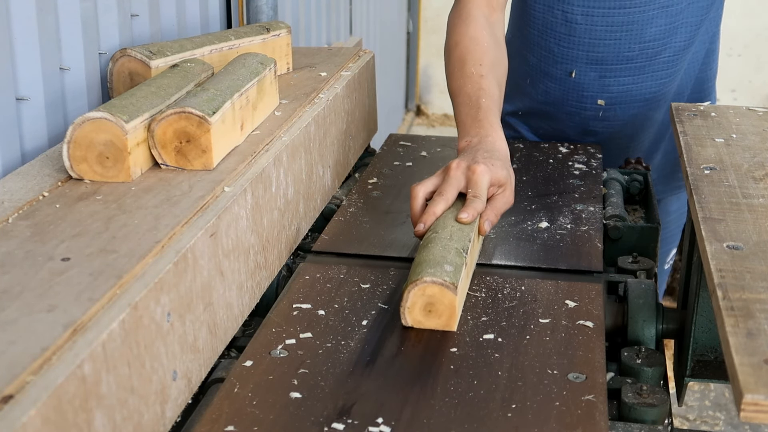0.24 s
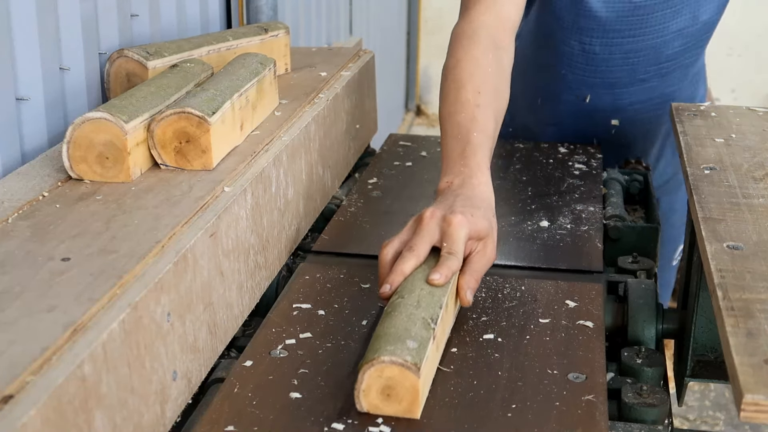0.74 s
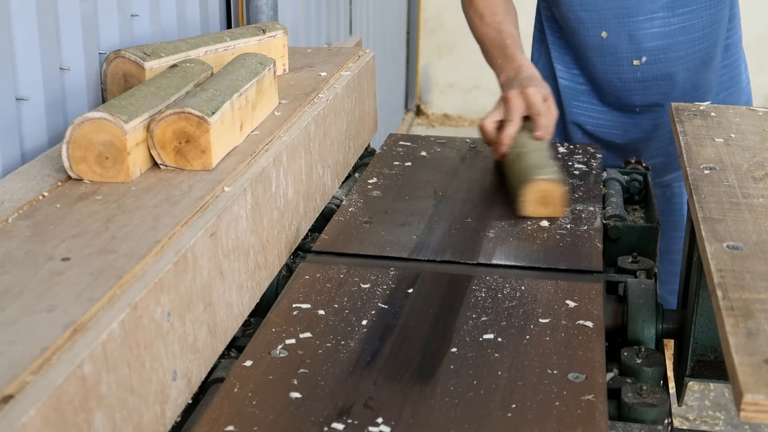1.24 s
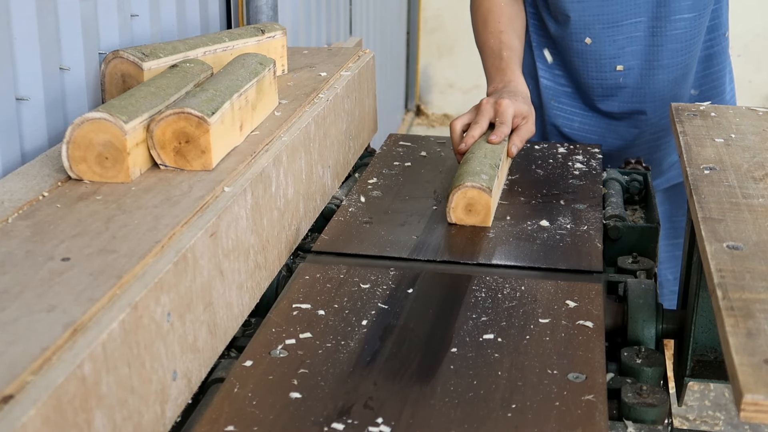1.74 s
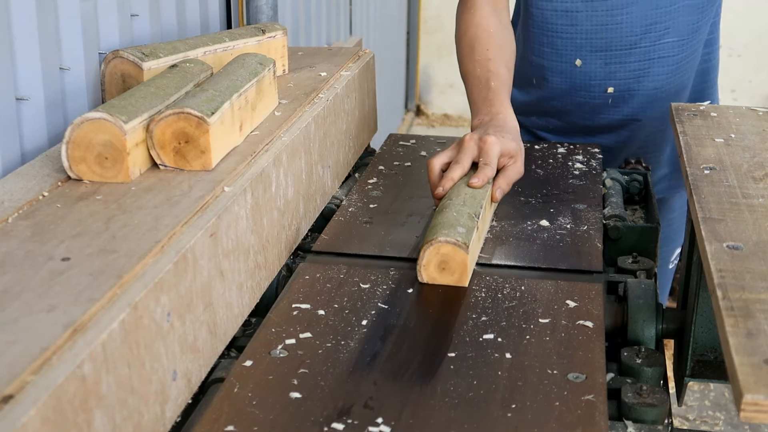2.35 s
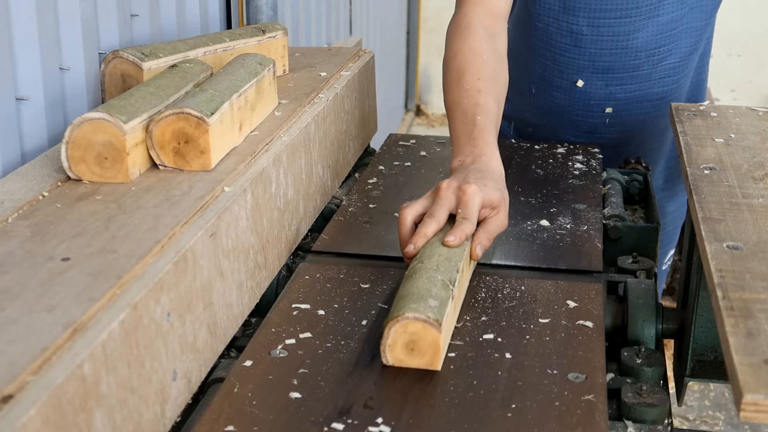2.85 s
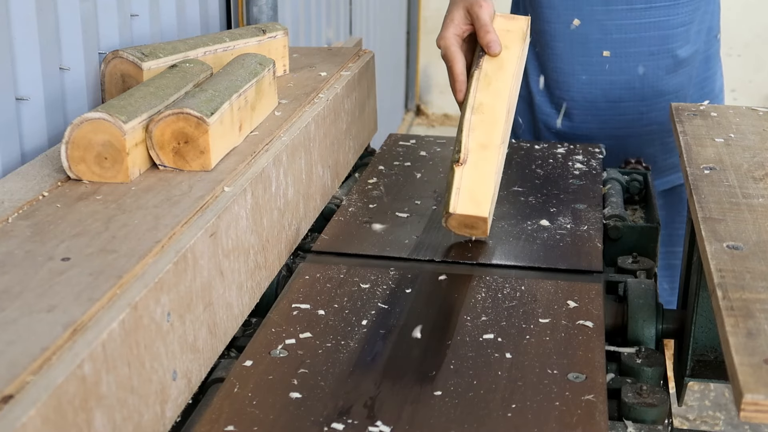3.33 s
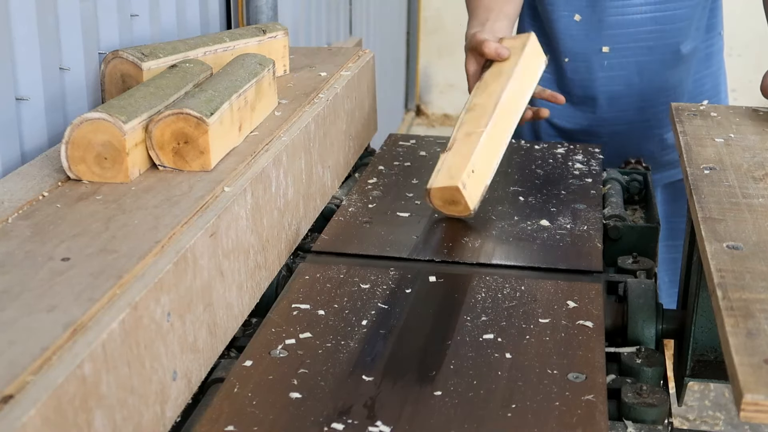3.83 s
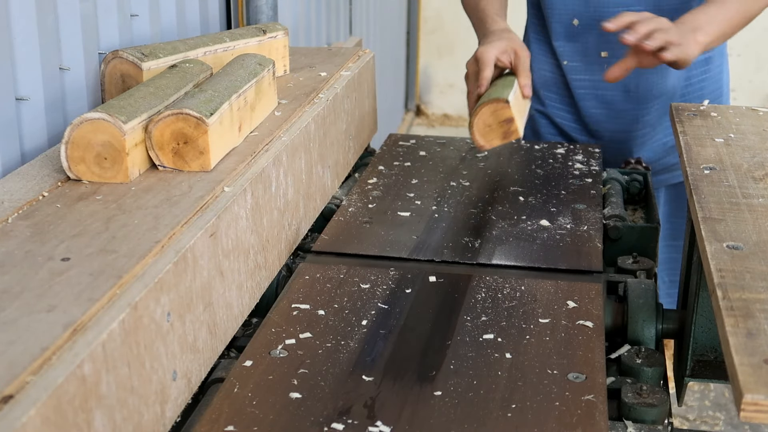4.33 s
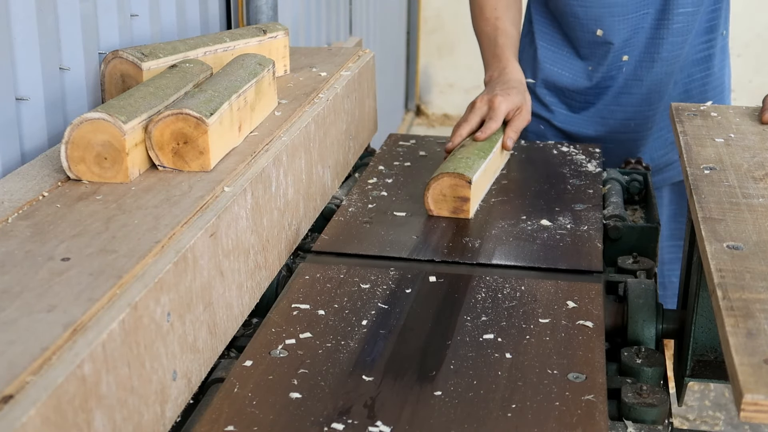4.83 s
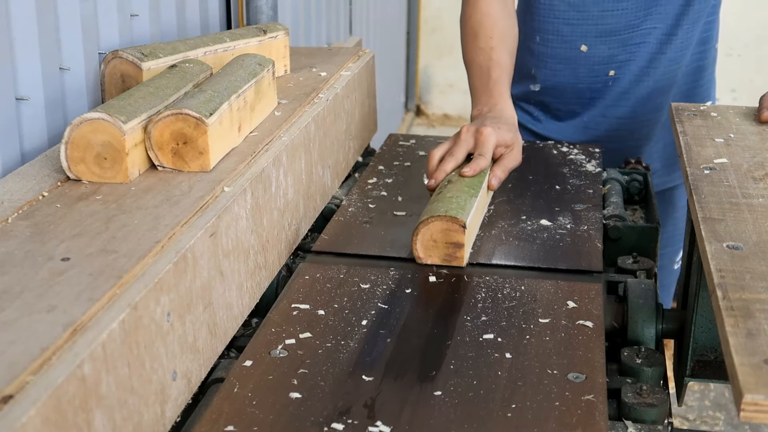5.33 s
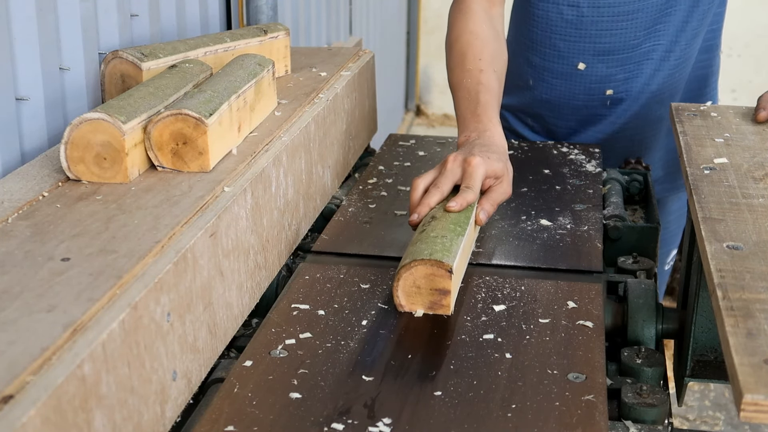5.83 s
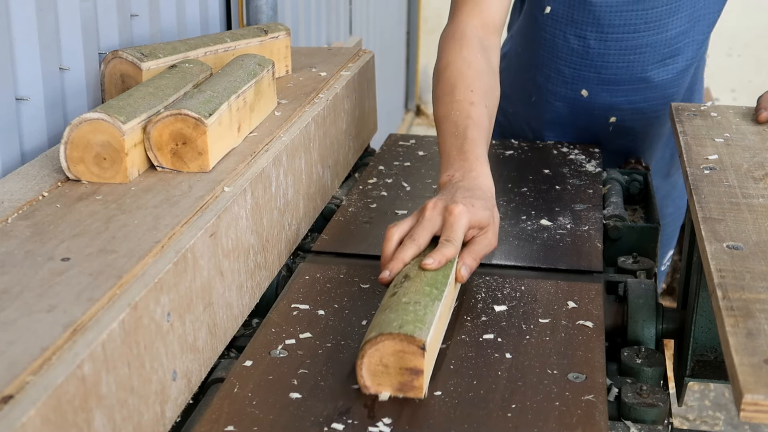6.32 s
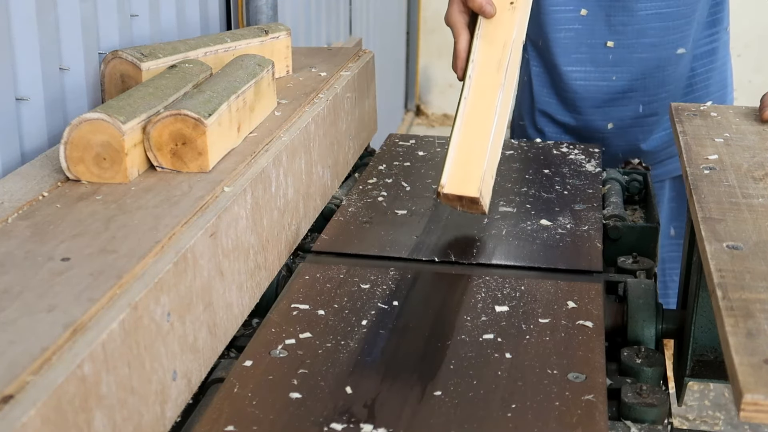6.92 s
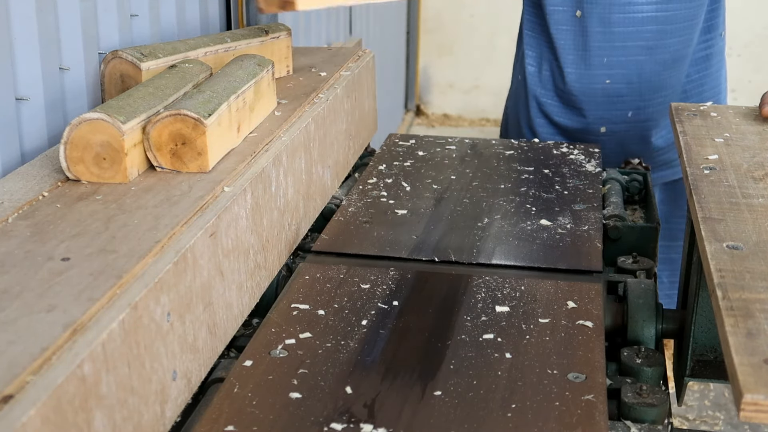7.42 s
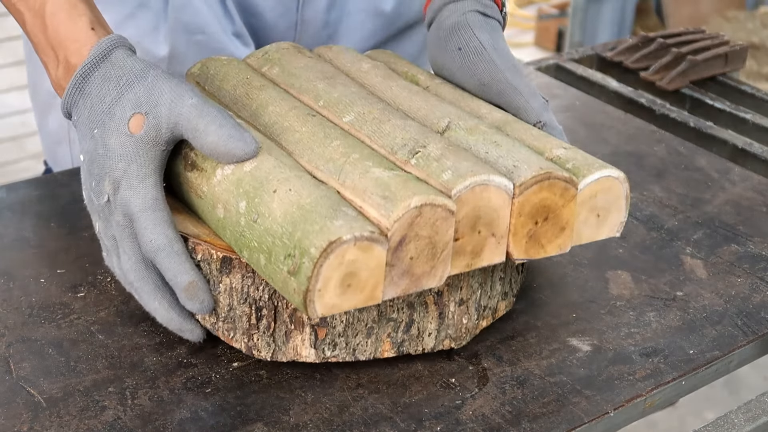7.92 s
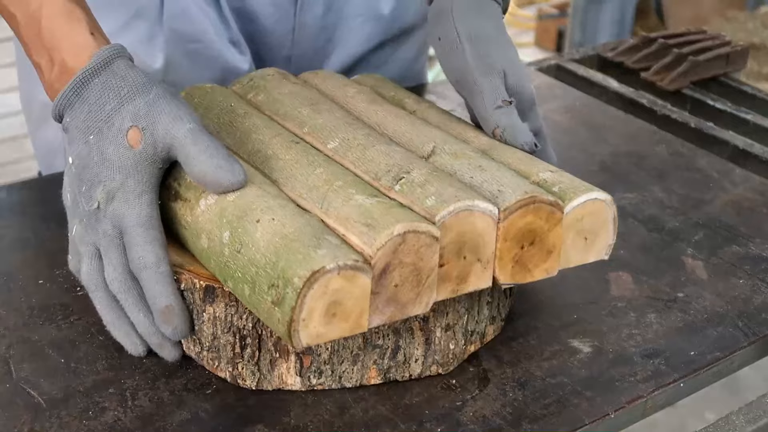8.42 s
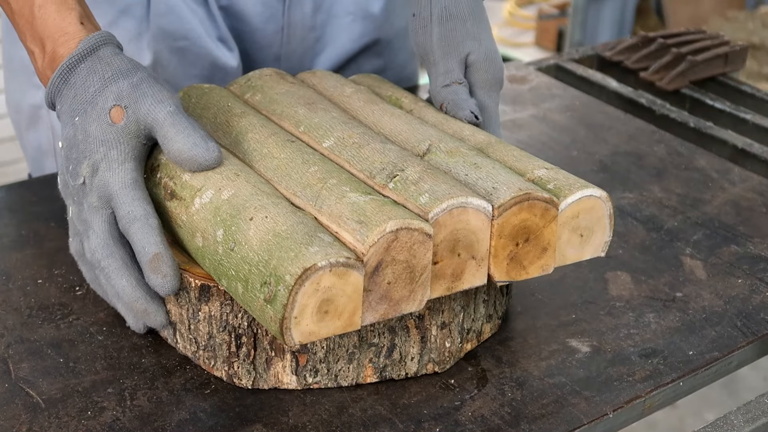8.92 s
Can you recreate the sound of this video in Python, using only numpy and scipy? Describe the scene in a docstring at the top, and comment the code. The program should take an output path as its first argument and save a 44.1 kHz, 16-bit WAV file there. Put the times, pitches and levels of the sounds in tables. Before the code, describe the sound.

A wood planer runs close by in a workshop, with a wavering low hum, rumble and rushing air. From the start its knives tear a branch with a rough hiss, chattering harder until 0.8 seconds. The machine idles, and the wood knocks on its iron bed at 1.3 and 1.5 seconds. A second cut runs from 2.1 to 3 seconds, ending in a loud rattle. Chips tick faintly at 3.8, a soft thump follows at 4.2, and the branch knocks at 4.6 and, more sharply, 4.8. The third cut lasts from 5.4 to 6.4 seconds, again finishing in chatter. At 7.6 the drone abruptly vanishes, leaving faint room noise and gloves brushing bark. At 8.3 a stack of branches thuds and clatters onto a steel table, which rings and fades, with faint brushes near 9. Throughout, the volume ducks at loud moments and swells back.

```python
"""First comes the drone of a jointer (a wood planer) and the hiss of its spinning knives tearing a branch.
The branch goes over three times, chattering harder as its tail leaves the table; between passes it
knocks on the iron bed. The machine is abruptly gone, gloves brush bark, and a stack of branches lands
on a ringing steel table. An automatic volume control ducks at every loud moment and swells back."""
import sys
import numpy as np
from scipy import signal
from scipy.fft import rfft, irfft, next_fast_len
from scipy.io import wavfile
from scipy.ndimage import uniform_filter1d, map_coordinates

SR = 44100
rng = np.random.default_rng(int(sys.argv[2]) if len(sys.argv) > 2 else 0)


def to_wav(sig):
    """Store sig (one row per channel, or 1-D mono) as 16-bit WAV at the path in sys.argv[1].

    Samples outside -1..1 are clipped; the rate is SR.
    """
    pcm = np.clip(np.atleast_2d(sig), -1, 1) * 32767
    pcm = np.round(pcm).astype(np.int16)
    wavfile.write(sys.argv[1], SR, pcm.T)  # frames by channels


N = 403956
TIME = np.arange(N) / SR


def amp(db):
    """Turn decibels into a multiplier."""
    return 10 ** (np.asarray(db) / 20)


def unit(x):
    """Scale to an average (rms) level of 1."""
    return x / np.sqrt(np.mean(x ** 2) + 1e-20)


def along(points, hz):
    """Read between (Hz, value) points, spaced as musical pitches."""
    f, v = np.transpose(points)
    return np.interp(np.log(hz + 1), np.log(f + 1), v)


def wobble(rate):
    """A smooth random curve for each ear, with rate new values a second."""
    knots = rng.standard_normal((2, int(N * rate / SR) + 4))
    coarse = TIME[::32]
    return np.array([np.interp(TIME, coarse, map_coordinates(k, [coarse * rate])) for k in knots])


def swell(s, db, half_length):
    """A smooth rise and fall that peaks at time s."""
    return amp(db) * np.exp(-((TIME - s) / half_length) ** 2)


def filtered(x, response):
    """Multiply each frequency of x by response(hz)."""
    n = x.shape[-1]
    m = next_fast_len(n + SR // 4)
    return irfft(rfft(x, m) * response(np.fft.rfftfreq(m, 1 / SR)), m)[..., :n]


def coloured(x, spectrum):
    """Shape the lows and highs of x, at level 1."""
    return unit(filtered(x, lambda hz: amp(along(spectrum, hz))))


def resonate(x, modes):
    """Pass x through an object that favours a few notes, at level 1."""
    def body(f):
        return sum(amp(db) * (1j * f * width / (hz * hz - f * f + 1j * f * width)) ** 2
                   for hz, width, db in modes)
    return unit(filtered(x, body))


def stereo_noise(alike, n=N):
    """White noise, as alike in both ears as the table says (1 is identical)."""
    def shares(hz):
        turn = np.arccos(np.clip(along(alike, hz), -1, 1)) / 2
        return np.array([np.cos(turn), np.sin(turn)])
    mid, side = filtered(rng.standard_normal((2, n)), shares)
    return np.array([mid + side, mid - side])


def swirling(depth_db, swirl_rad, frame=2048, patch_frames=6):
    """Noise whose frequencies come and go in patches and drift between the ears."""
    frames = dict(nperseg=frame, noverlap=frame - frame // 4)
    z = signal.stft(rng.standard_normal(N), **frames)[2]
    patches = uniform_filter1d(rng.standard_normal((2,) + z.shape), size=5, axis=1)
    gain, turn = unit(uniform_filter1d(patches, size=patch_frames, axis=2))
    z = z * amp(depth_db * gain)
    lead = np.exp(.5j * swirl_rad * turn)
    return signal.istft(np.array([z * lead, z / lead]), **frames)[1][:, :N]


def dying(x, fade_times):
    """Fade each frequency at its own speed. A fade time is how long a drop of 60 dB takes."""
    hz, t, z = signal.stft(x, SR, nperseg=256)
    fade = amp(-60 * t / along(fade_times, hz)[:, None])
    return signal.istft(z * fade, SR, nperseg=256)[1][:, :x.shape[-1]]


def ring(modes, t, scatter_db):
    """The fading notes of a struck object, a little different at each blow."""
    hz, db, fade_s = np.transpose(modes)[:, :, None]
    size, phase = rng.uniform(-1, 1, (2, len(modes), 1))
    levels = amp(db + scatter_db * size - 60 * t / fade_s)
    return np.sum(levels * np.sin(2 * np.pi * hz * t + np.pi * phase), axis=0)


def soften(x, corner_hz, order):
    """Turn down everything above corner_hz, as a softer contact does."""
    return signal.sosfilt(signal.butter(order, min(corner_hz, SR / 3), fs=SR, output="sos"), x)


def add(track, s, sound):
    """Mix a sound into the track at time s."""
    part = track[:, round(s * SR):][:, :sound.shape[-1]]
    part += sound[..., :part.shape[-1]]


# The branch's passes. Each row: start and end in seconds, tearing in dB, rattle in dB,
# build-up of the tearing and of the rattle in seconds, frame shudder in dB.
PASSES = [(-0.1, 0.78, -30, -26, 0.21, 0.11, -29), (2.14, 3.038, -31, -30.5, 0.52, 0.1, -27.5),
          (5.432, 6.423, -29.5, -30.5, 0.18, 0.14, -24)]
ENTRY_S, EXIT_S = 0.0097, 0.018  # the cut starts and dies away
BITE_DB, BITE_S = 7, 0.031  # the knives bite harder into the front edge
TAIL_TEAR_DB, TAIL_RATTLE_DB = 10, 8.5  # extra as ever less wood rests on the table
RATTLE_LEAD_S = 0.048  # the rattle peaks this long before the end
FEED_DB, SHAKE_DB, FEED_RATE = 0.74, 1.3, 11  # uneven push: swing of tearing, of shaking, changes a second

def feed_branch():
    """Levels for contact, tearing, rattle and shudder: each pass bites, steadies, then roughens."""
    levels = np.zeros((4, N))
    for start, end, tear_db, rattle_db, tail_s, rattle_s, shudder_db in PASSES:
        since, left = np.maximum(TIME - start, 0), np.maximum(end - TIME, 0)
        contact = (1 - np.exp(-since / ENTRY_S)) * np.exp(-np.maximum(TIME - end, 0) / EXIT_S)
        tail = np.exp(-(left / tail_s) ** 2)
        loose = 1 / (1 + ((left - RATTLE_LEAD_S) / rattle_s) ** 2)
        tear = amp(tear_db + BITE_DB * np.exp(-since / BITE_S) + TAIL_TEAR_DB * tail)
        rattle = amp(rattle_db + TAIL_RATTLE_DB * loose)
        levels += [contact, contact * tear, contact * rattle, contact * amp(shudder_db)]
    levels[1] *= amp(FEED_DB * wobble(FEED_RATE)[0])
    return levels


# The hum falters and races. Each row: time in seconds, pitch in Hz.
HUM_PITCH = [(0.0, 159.5), (0.26, 166.5), (0.34, 155), (0.48, 166.4), (0.76, 164.6), (0.8, 158.0),
             (1.42, 163), (2.02, 161.8), (2.08, 157.1), (2.57, 162), (2.73, 158.7), (2.79, 164),
             (3.27, 157.3), (4.01, 161.3), (4.23, 157.9), (4.31, 162.2), (4.47, 158.6), (4.55, 165),
             (4.69, 160), (4.85, 161.8), (5.13, 160), (5.69, 163), (5.87, 156.8), (6.13, 166.1),
             (6.62, 158.7), (7.26, 161.4), (7.36, 158), (7.6, 166.5)]
WAVER_HZ, WAVER_RATE = 0.94, 12  # depth, changes a second

def hum_cycles():
    """Count the cycles of the machine's hum as its pitch wavers."""
    pitch_hz = np.interp(TIME, *np.transpose(HUM_PITCH)) + WAVER_HZ * wobble(WAVER_RATE)[0]
    return np.cumsum(pitch_hz) / SR


# The hum's tones. Each row: multiple of its pitch, level in dB, phase drift in radians.
HUM_TONES = [(1, -14.5, 0.53), (5 / 4, -34.5, 1), (3 / 2, -31, 0.3), (7 / 4, -35.5, 0.8), (2, -31.5, 0.84),
             (3, -37, 1.0)]
# The frame's steady rumble and its shudder in a cut. Each row: frequency in Hz, level in dB.
RUMBLE = [(20, -25), (45, -5), (75, -7), (120, 4.5), (160, 0.5), (205, 0), (260, -6), (330, -35),
          (600, -120)]
SHUDDER = [(20, -24), (45, -0.5), (85, -9), (130, 6), (200, 0.5), (300, -45.5)]
# The bass sways between the ears. Each row: time in seconds, the left ear's lead in cycles.
BASS_SWAY = [(0.0, 0.087), (0.2, -0.26), (0.3, 0.38), (0.48, -0.32), (0.52, 0.39), (0.64, -0.0075),
             (0.74, -0.91), (0.98, -0.019), (1.3, -0.876), (1.66, -1.2), (1.7, -0.85), (2.12, -0.62),
             (2.37, -1.13), (2.65, 0.47), (2.83, 0.274), (3.05, 0.83), (3.33, 0.087), (3.43, 0.45),
             (3.55, -0.076), (3.65, 0.058), (3.69, 0.65), (4.31, 0.77), (4.45, 0.12), (5.15, -0.815),
             (5.55, -0.66), (5.71, -2.04), (5.85, -1.276), (5.93, -1.72), (6.19, -1.7), (6.21, -1.33),
             (6.37, -2.04), (6.59, -1.11), (6.68, -0.99), (6.74, -1.484), (7.1, -1.14), (7.2, -1.633),
             (7.48, -1.43), (7.6, -1.06)]
SWAY_RAD, SWAY_RATE = 0.25, 25  # extra random sway: depth, changes a second
THROB_HZ, THROB_DB, THROB_RISE = 40.6, -33, 0.148  # the pitch rises by this share at full load
RUMBLE_DB, MUFFLE_DB = -27.5, -2.5

def drone(cycles, load, shudder):
    """Hum, deep throb and rumble. In a cut, wood over the slot muffles the hum and the frame shudders."""
    hum = np.zeros(N)
    for multiple, db, wander in HUM_TONES:
        drift = wander * (0.68 * wobble(11)[0] + 0.74 * wobble(55)[0])
        hum += amp(db + 0.93 * wobble(30)[0]) * np.sqrt(2) * np.sin(2 * np.pi * multiple * cycles + drift)
    throb_cycles = np.cumsum(THROB_HZ * (1 + THROB_RISE * load) + 1.9 * wobble(9)[0]) / SR
    throb = amp(THROB_DB + 2.1 * wobble(7.3)[0]) * np.sqrt(2) * np.sin(2 * np.pi * throb_cycles)
    rumble = amp(RUMBLE_DB + 1.2 * wobble(18)[0]) * coloured(rng.standard_normal(N), RUMBLE)
    frame = shudder * amp(2.9 * wobble(14)[0]) * coloured(rng.standard_normal(N), SHUDDER)
    lead = 2 * np.pi * np.interp(TIME, *np.transpose(BASS_SWAY)) + SWAY_RAD * wobble(SWAY_RATE)[0]
    bass = signal.hilbert(amp(MUFFLE_DB * load) * hum + throb + rumble + frame)
    return np.real(bass * np.exp(1j * lead * np.array([[.5], [-.5]])))


# Rushing air and the housing's low roar. Each row: frequency in Hz, level in dB.
AIR = [(150, -9), (400, -12), (650, -6.5), (817, -1), (1160, -10), (1440, 0), (1890, -10.5), (2200, 1.5),
       (2330, 2.5), (2620, -4), (2880, -12), (3410, -18.5), (9070, -31.5), (10700, -40), (12200, -64)]
ROAR = [(100, -88), (190, -3.5), (270, -1), (320, 1), (420, -3), (500, -3), (680, -13.5), (1000, -45),
        (2000, -120)]

def rushing_air(cycles):
    """The knives whip air through their slot, pulsing with the hum, over the housing's roar."""
    pulse = 1 + 0.14 * np.sin(2 * np.pi * cycles + 1.3 * wobble(10)[0])
    flutter = amp(1.19 * wobble(130)[0] + 0.86 * wobble(12)[0])
    air = coloured(swirling(depth_db=0.25, swirl_rad=3.56) * pulse, AIR)
    roar = coloured(swirling(depth_db=1.0, swirl_rad=3.53), ROAR)
    return flutter * (amp(-23) * air + amp(-25) * roar)


KNIFE_HZ = 107.3  # strokes a second

def knife_strokes(noise, life_s, scatter_db, steady):
    """Each stroke tears off a chip: a burst of its own size on top of steady noise."""
    count, phase = np.divmod(TIME * KNIFE_HZ, 1)
    sizes = amp(scatter_db * rng.uniform(-1, 1, int(count[-1]) + 1))
    burst = unit(sizes[count.astype(int)] * np.exp(-phase / KNIFE_HZ / life_s))
    return (steady + burst) * noise


# Tearing wood fibres. Each row: frequency in Hz, level in dB.
FIBRES = [(150, 8), (400, 4.5), (650, 7), (1200, -3), (2300, 8), (2900, 0), (3300, -4.5), (3700, -0.5),
          (4200, -0.5), (5700, -0.5), (6980, -5.5), (9380, -8), (12100, -17), (13000, -45)]

def tearing_wood(tear):
    """The fibres hiss as the knives rip through them."""
    noise = swirling(depth_db=1.86, swirl_rad=4.2, frame=1024, patch_frames=20)
    rips = knife_strokes(noise, life_s=0.0027, scatter_db=5.0, steady=2.6)
    return amp(3 + 0.24 * wobble(32)[0]) * tear * coloured(rips, FIBRES)


# The notes of the jointer's table. Each row: pitch in Hz, width in Hz, level in dB.
TABLE_NOTES = [(1050, 127, -4.5), (1234, 110, 0), (1324, 47, 6), (1443, 187, 1), (1830, 300, -7.5),
               (2337, 510, -5)]
# Hard spots in the wood. Each row: time in seconds, level in dB.
HARD_SPOTS = [(0.22, -43), (2.3, -27.5), (2.6, -29.5), (5.73, -31), (6.08, -30.5)]

def table_rattle(rattle, contact):
    """The strokes shake the table, and hard spots in the wood jolt it."""
    jolts = sum(swell(s, db, half_length=0.04) for s, db in HARD_SPOTS)
    noise = swirling(depth_db=0.0, swirl_rad=3.63)
    blows = knife_strokes(noise, life_s=0.0019, scatter_db=-1.0, steady=1.25)
    return amp(2) * (rattle + contact * jolts) * resonate(blows, TABLE_NOTES)


# The branch chatters as the grip loosens. Each row: time in seconds, level in dB, pitch in Hz.
CHATTER = [(0, -30, 850), (.34, -21.5, 898), (.58, -20.5, 865), (.65, -12, 850), (.71, -17, 870),
           (2.15, -34, 880), (2.8, -34.5, 881), (2.93, -14, 855), (3.015, -12, 880), (3.05, -34, 880),
           (5.97, -34.5, 894), (6.139, -20.5, 875), (6.3, -20.5, 846), (6.39, -10.5, 870), (6.44, -32, 870)]
# The table's high notes. Each row: pitch in Hz, width in Hz, level in dB.
WHINE = [(3000, 19, 4.5), (5800, 300, -11)]
BRANCH_WIDTH_HZ, BRANCH_ROUGH = 62, 1.47  # the rough part's spread, and its size beside the clean part

def branch_chatter(contact):
    """The knives keep the branch ringing on one rough, sliding note; the table whines along."""
    times, db, pitch_hz = np.transpose(CHATTER)
    phase = 2 * np.pi * np.cumsum(np.interp(TIME, times, pitch_hz)) / SR
    spread = lambda: unit(soften(rng.standard_normal((2, N)), BRANCH_WIDTH_HZ, order=2))
    clean = np.sin(phase + 0.99 * wobble(30)[0] + 0.65 * wobble(20))
    rough = spread() * np.sin(phase) + spread() * np.cos(phase)
    whine = amp(-18.5) * resonate(rng.standard_normal((2, N)), WHINE)
    return contact * amp(np.interp(TIME, times, db)) * (unit(clean + BRANCH_ROUGH * rough) + whine)


# The workshop's background. Each row: frequency in Hz, level in dB.
ROOM_TONE = [(25, -12), (60, 0.5), (140, -2), (250, -9.5), (750, -13), (1500, -18.5), (3000, -23),
             (6000, -30), (11000, -39), (13000, -49)]
# How quiet sounds spread. Each row: frequency in Hz, likeness between the ears.
QUIET_ALIKE = [(100, 1), (700, 0.78), (2800, 0.68), (6200, .05)]

def room_tone():
    """A faint, low noise fills the shop throughout."""
    return amp(-41) * coloured(stereo_noise(QUIET_ALIKE), ROOM_TONE)


# Two last blows per pass. Each row: time in seconds, level in dB, half-length in seconds.
KICKS = [(0.734, -7.5, .008), (0.761, -8, 0.017), (2.982, -10.5, .007), (3.013, -4.5, 0.014),
         (6.385, -13.5, 0.015), (6.414, -14.5, 0.0063)]
# The notes they ring with. Each row: pitch in Hz, width in Hz, level in dB.
KICK_NOTES = [(870, 210, -0.5), (1190, 200, -2), (1420, 350, 6.5), (1730, 330, -5), (2590, 300, -3.5),
              (2880, 300, -8.5), (4530, 400, -7), (5940, 900, -26)]

def tail_kicks(contact):
    """The knives kick the branch's tail as it tips off the table."""
    kicks = sum(swell(*kick) for kick in KICKS)
    noise = stereo_noise([(1000, 0.32), (5000, 0.17)])
    blows = knife_strokes(noise, life_s=0.0018, scatter_db=5.5, steady=0.93)
    return amp(1.5) * contact * kicks * resonate(blows, KICK_NOTES)


# Wood on iron. Each row: start in seconds, level in dB, brightness in Hz, rise in seconds.
KNOCKS = [(1.274, -1, 1040, 0.0084), (1.518, -5, 596, 0.0046), (1.537, -0.5, 1580, 0.007),
          (1.571, -9, 890, 0.0046), (4.55, -2, 999.3, 0.009), (4.798, -13, 450, 0.0023),
          (4.8068, 1, 4000, 0.00059), (4.8093, 6, 5570, 0.00084), (4.838, -17, 3000, 0.0047)]
# The notes of a knock. Each row: pitch in Hz, level in dB, fade time in seconds.
BED_NOTES = [(398, -5, 0.049), (633, -8, 0.027), (856, 0.5, 0.029), (1050, -8, 0.018), (1290, 3.5, 0.028),
             (1527, 0.5, 0.062), (2100, -5, .025), (2380, -11, .045), (2720, -6, 0.055)]
# The shop's echo. Each row: frequency in Hz, fade time in seconds.
SHOP_FADE = [(200, 0.5), (2000, 0.25), (10000, 0.22)]

def knocks():
    """The branch is put back on the iron bed, damped by the hand; the shop echoes."""
    track, t = np.zeros((2, N)), np.arange(SR // 3) / SR
    crunch_colour = [(150, 2.0), (700, -1.0), (1700, 2.5), (3500, -10.5), (8000, -14), (11500, -32)]
    for s, db, bright_hz, rise in KNOCKS:
        crunch = coloured(rng.standard_normal((2, len(t))), crunch_colour)
        blow = ring(BED_NOTES, t, scatter_db=0.0) + 1.52 * amp(-60 * t / 0.054) * crunch
        add(track, s, amp(db) * soften((1 - np.exp(-t / rise)) * blow, bright_hz, order=4))
    room = dying(rng.standard_normal((2, len(t))), SHOP_FADE)
    echo = signal.fftconvolve(track, room / np.linalg.norm(room[0]), axes=1)[:, :N]
    return track + amp(-6.5) * echo


# Loose chips. Each row: start in seconds, level in dB.
CHIPS = [(3.785, -15.5), (3.799, -15.5)]
# The slot's notes. Each row: pitch in Hz, level in dB, fade time in seconds.
SLOT_NOTES = [(2160, -0.5, 0.014), (2290, 2, 0.019), (2557, -9, .015)]

def chips():
    """Loose chips caught by the knives tick in the slot."""
    track, t = np.zeros((2, N)), np.arange(SR // 20) / SR
    for s, db in CHIPS:
        add(track, s, amp(db) * (1 - np.exp(-t / 0.0006)) * ring(SLOT_NOTES, t, scatter_db=-3))
    return track


def thump(s=4.167, db=-18, hz=86):
    """One soft low thump between passes, a cycle or two long."""
    return swell(s, db, half_length=0.0052) * np.cos(2 * np.pi * hz * (TIME - s))


# Touches of the gloves. Each row: time in seconds, level in dB, half-length in seconds.
BRUSHES = [(7.92, -53.5, 0.048), (8.241, -49, 0.0055), (8.83, -73, .04), (8.945, -56, .025),
           (9.09, -72, .015)]

def gloves():
    """Gloves brush over the bark in short, faint hisses."""
    touch = sum(swell(*brush) for brush in BRUSHES)
    colour = [(400, -19), (2500, -12), (9000, -17), (13000, -31)]
    return touch * coloured(stereo_noise(QUIET_ALIKE), colour)


# The branches land in turn. Each row: start in seconds, level in dB, brightness in Hz.
LANDINGS = [(8.317, -1.5, 1200), (8.3247, 3, 1750), (8.3523, 0.5, 2770), (8.364, -10.5, 2700),
            (8.381, -10, 2700), (8.415, -17.5, 3800)]
# Their clatter. Each row: frequency in Hz, then the value named alongside.
CLATTER = [(35, -32), (55, -32), (91, -4.5), (180, -1), (288, -8.5), (400, -5.5), (620, -4.5), (1150, -11),
           (1900, -19.5), (3000, -11.5), (4500, -17), (8200, -17), (10500, -43)]  # level in dB
CLATTER_FADE = [(80, 0.32), (190, 0.74), (560, 0.45), (1470, 0.53), (3880, 0.36), (9000, 0.47)]  # fade time in seconds
CLATTER_ALIKE = [(600, 0.98), (1400, 0.97), (2900, 0.84), (6200, 0.27)]  # likeness between the ears
# Notes of the branches, the steel table, and its top giving under the weight.
# Each row: pitch in Hz, level in dB, fade time in seconds.
WOOD_NOTES = [(373, -3, .12), (452, -10, .3), (685, -2, 0.39), (952, -4, 0.23), (1230, -5, 0.24),
              (2220, -6, 0.16), (2990, -14, .24), (2940, -11, .24), (3155, -6, .22), (3456, -12, .24)]
STEEL_NOTES = [(100, -22, 2.06), (152, -19, 0.88), (183, -14.5, 0.82), (337, -31, 1.8), (580, -8, 0.49),
               (693, -29.5, 1.1), (1097, -8.5, 0.38)]
THUD_NOTES = [(111, -0.5, 0.25), (206, -2, 0.18), (420, -8, 0.14), (643, 1, 0.11)]
LANDING_LOWEST_HZ = 65  # the landing is cut off below this

def stack_landing():
    """The stack thuds down and clatters; the first blow sets the steel table ringing."""
    track, t = np.zeros((2, N)), np.arange(SR) / SR
    onset = 1 - np.exp(-t / 0.0018)
    blow = onset * (1 + 1.6 * np.exp(-t / 0.065))  # the direct sound stands above the room's echo
    for s, db, bright_hz in LANDINGS:
        clatter = dying(coloured(stereo_noise(CLATTER_ALIKE, len(t)), CLATTER), CLATTER_FADE)
        wood = amp(-6.5) * onset * ring(WOOD_NOTES, t, scatter_db=3.0)
        add(track, s, amp(db) * soften(amp(-4.5) * blow * clatter + wood, bright_hz, order=2))
    add(track, LANDINGS[0][0], amp(2) * onset * ring(STEEL_NOTES + THUD_NOTES, t, scatter_db=1.5))
    return signal.sosfilt(signal.butter(3, LANDING_LOWEST_HZ, "high", fs=SR, output="sos"), track)


FULL_LOAD_DB = -22  # tearing this strong counts as full load
MACHINE_ENDS_S = 7.606

def scene():
    """The jointer at work, then the stack in the quiet shop."""
    contact, tear, rattle, shudder = feed_branch()
    branch_shake, table_shake = amp(SHAKE_DB * wobble(FEED_RATE))
    load = np.clip(tear / amp(FULL_LOAD_DB), 0, 1)
    cycles = hum_cycles()
    machine = drone(cycles, load, shudder) + rushing_air(cycles) + tearing_wood(tear)
    machine += table_shake * table_rattle(rattle, contact) + branch_shake * branch_chatter(contact)
    machine += tail_kicks(contact) + knocks() + chips() + thump()
    running = np.clip((MACHINE_ENDS_S - TIME) / 0.0026, 0, 1)
    return running * machine + stack_landing() + gloves() + room_tone()


def volume_control(x, threshold_db, slope, release_s, window_s, lag_s):
    """The volume drops at once when the sound above the bass gets loud, then creeps back."""
    sensed = signal.sosfilt(signal.butter(2, 500, "high", fs=SR, output="sos"), x)
    power = np.abs(uniform_filter1d(np.mean(sensed ** 2, axis=0), int(window_s * SR)))
    over_db = slope * np.maximum(10 * np.log10(power + 1e-12) - threshold_db, 0)
    fading = np.exp(-TIME / release_s)
    held_db = np.maximum.accumulate(over_db / fading) * fading
    return x * amp(-np.interp(TIME - lag_s, TIME, uniform_filter1d(held_db, size=130)))


# The right microphone is brighter. Each row: frequency in Hz, level over the left in dB.
RIGHT_BOOST = [(400, 0), (1200, 0.5), (2300, 1), (9000, 1.4)]
TOP_HZ = 13200

def record(dry):
    """Duck loud moments, clip the peaks, brighten the right side and cut the highest treble."""
    ducked = volume_control(dry, threshold_db=-20, slope=0.69, release_s=0.39, window_s=0.0033,
                            lag_s=0.00093)
    microphones = lambda hz: amp(along(RIGHT_BOOST, hz) * np.array([[-.5], [.5]]))
    return filtered(np.clip(ducked, -1, 1), lambda hz: microphones(hz) * (hz < TOP_HZ))


dry = scene()
out = record(dry)
to_wav(out)
```